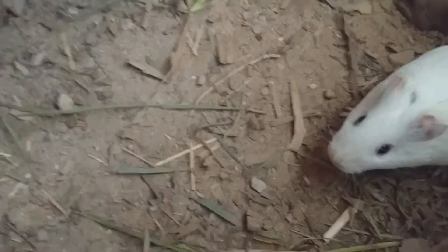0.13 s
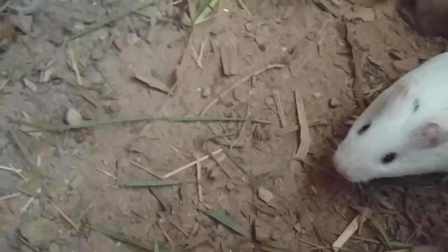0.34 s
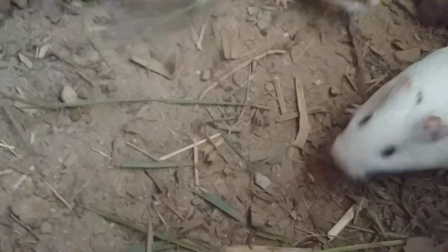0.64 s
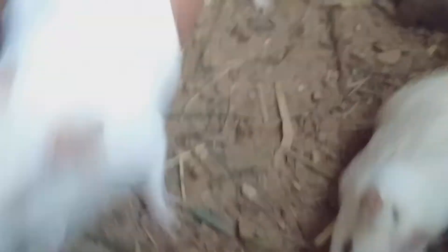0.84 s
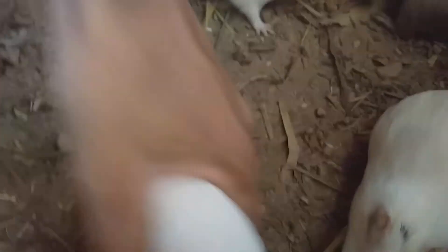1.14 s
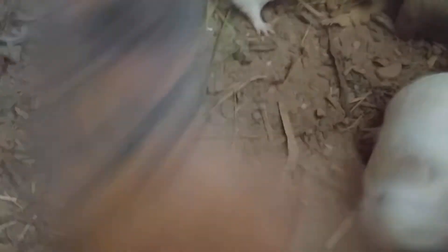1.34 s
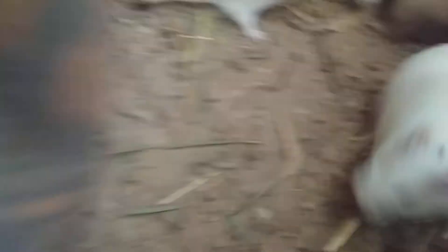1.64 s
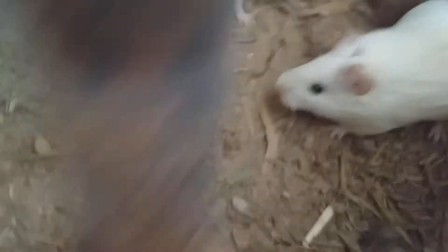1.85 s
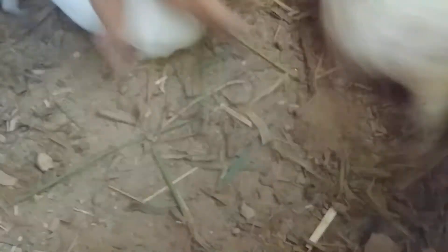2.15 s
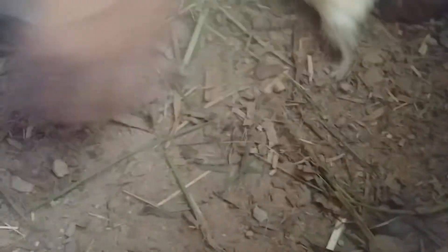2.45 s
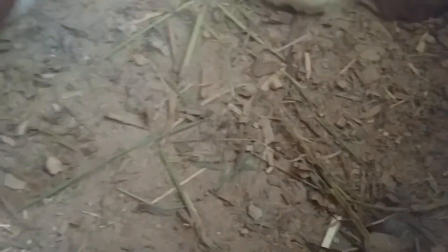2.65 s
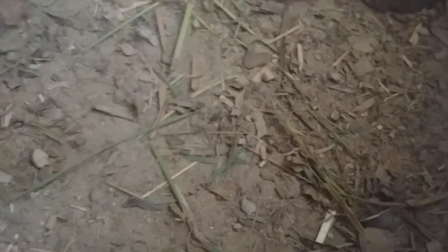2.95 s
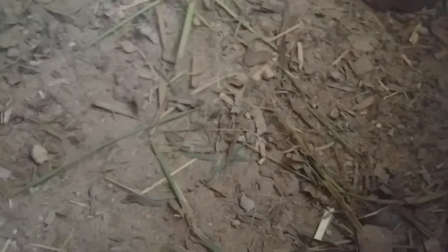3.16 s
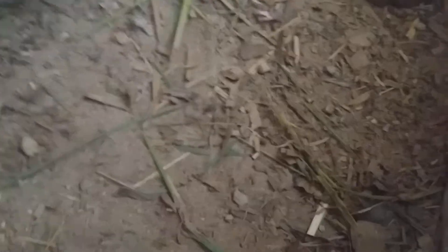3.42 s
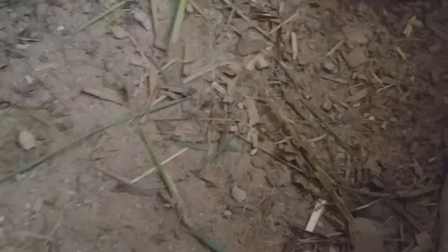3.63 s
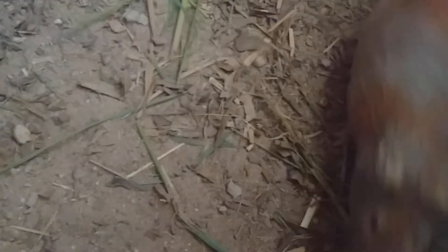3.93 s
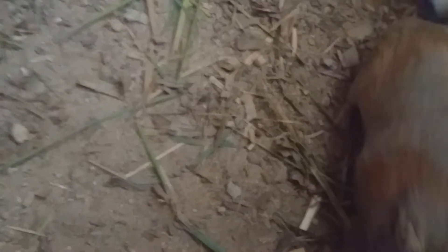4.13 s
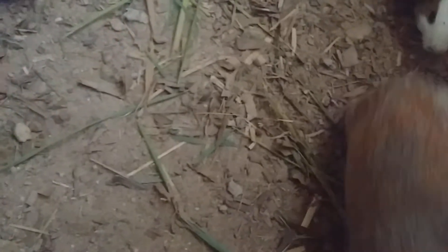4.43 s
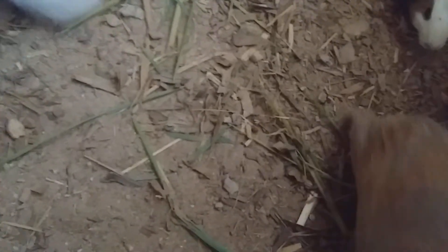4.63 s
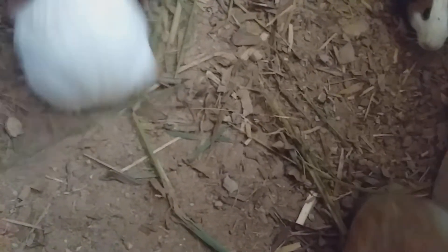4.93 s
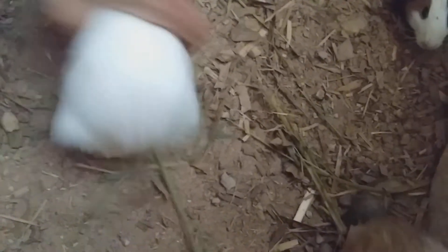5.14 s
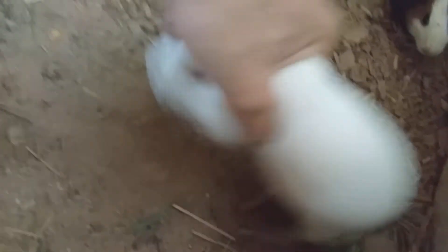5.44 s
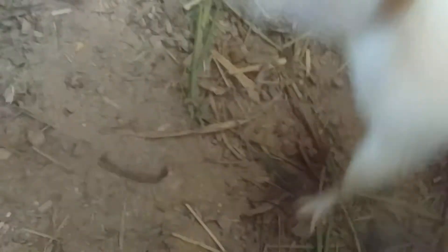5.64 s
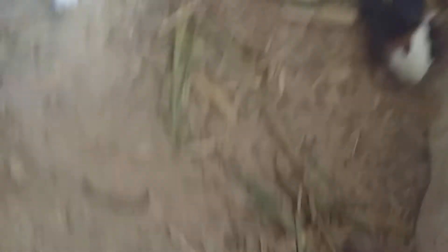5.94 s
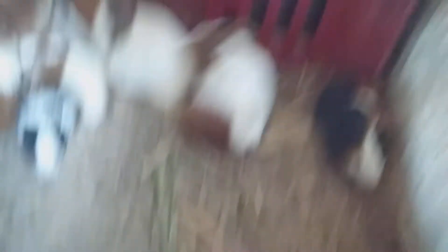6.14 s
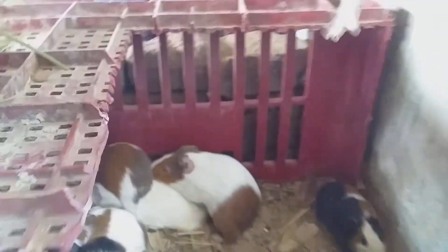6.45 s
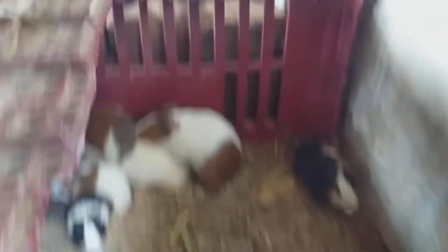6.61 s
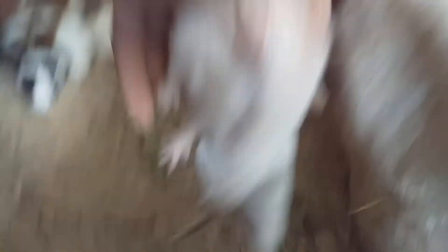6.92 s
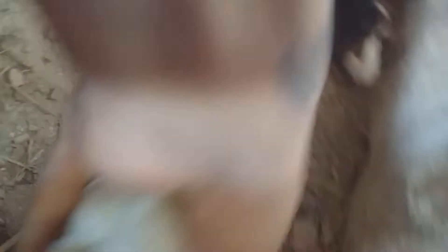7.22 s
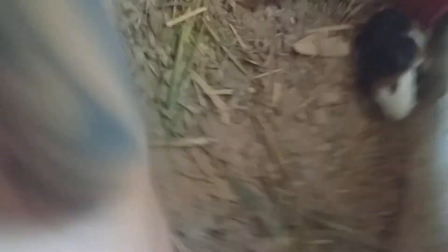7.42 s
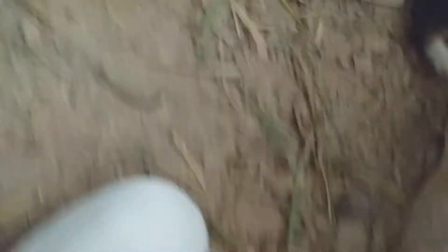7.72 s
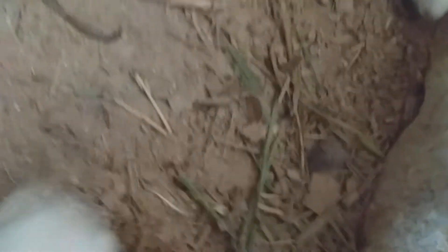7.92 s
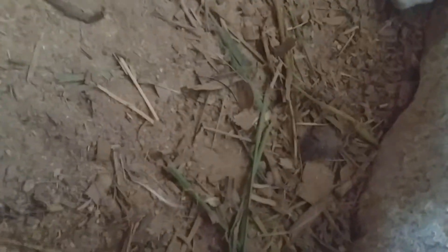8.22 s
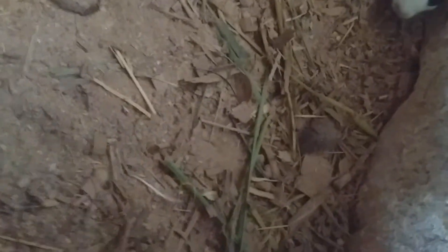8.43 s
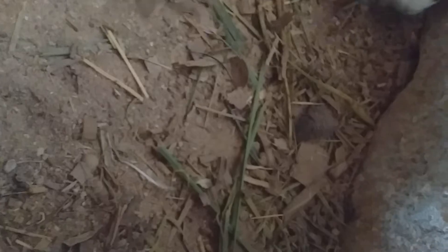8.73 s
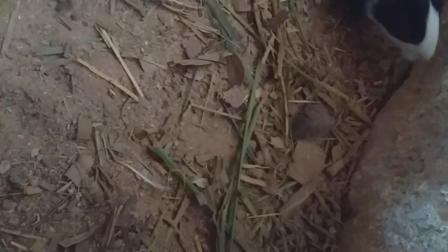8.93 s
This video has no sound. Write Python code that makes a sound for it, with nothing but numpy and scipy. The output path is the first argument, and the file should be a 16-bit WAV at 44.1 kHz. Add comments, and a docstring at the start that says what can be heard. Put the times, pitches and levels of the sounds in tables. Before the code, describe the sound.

A close, small-microphone scene of about nine seconds in an earth-floored pen with short reverberation and a faint low hum. It opens with stirred straw, small stalk snaps, soft low guinea pig clucks, a huddle peeping further off and faint falling bird cheeps. From 0.6 s chased animals whistle in quick rising glides; around 1.6-2 s something drags with a thin, high scrape amid scuffling. Between 2.8 and 5.5 s the whistles crowd together, sweeping from low throaty starts to piercing tops, the strongest near 5.4 s; a dull thump falls at 3.5 s. Around 6 s voices drop away to a husky rustle, then distant cheeps and a diffuse sweep near 7 s. Hard, low thumps cluster at 7.5-7.7 s with sharp snaps. Low chatter resumes, and weaker rising whistles return from 8.5 s over rustling litter to the end.

```python
"""Cavies in an earth-floored pen; stirred litter (noise and grains), chatter (gliding tones) and far cheeps open.
From 0.6 s loud whistles (gliding partials) come from the ones being chased; at 1.6 s something drags (resonant noise).
Most whistles fall between 2.8 and 5.5 s; a husky rustle follows at 6 s, then far cheeps and a diffuse sweep near 7 s.
Low rings thump the ground throughout, hardest at 7.5-7.7 s; stalks snap (short noise bursts); whistles return at 8.5 s.
A small microphone takes it in: near calls with the pen's short reverberation, a low hum (banded noise) behind."""
import sys
import numpy as np
from scipy import signal
from scipy.io import wavfile
from scipy.ndimage import map_coordinates

SR = 44100
rng = np.random.default_rng(int(sys.argv[2]) if len(sys.argv) > 2 else 0)


def persist_wave(psi):
    """Save psi, clipped to +-1, as 16-bit WAV."""
    counts = np.round(np.clip(psi, -1, 1) * 32767).astype(np.int16)
    wavfile.write(sys.argv[1], SR, np.atleast_2d(counts).T)


N = 399987

# near, open-mouthed whistles, one curve per call: [t/s, pitch f/Hz, fundamental level/dB, octave level/dB,
# third partial level/dB]
WHISTLE_CURVES = [
    [(0.6, 1345, -53, -72, -62), (0.618, 1502, -47, -60, -54), (0.646, 1466, -42.5, -52, -53),
     (0.66, 1675, -55, -57, -77), (0.682, 2150, -45, -35.5, -68), (0.7, 2325, -42, -48, -62),
     (0.732, 2530, -46, -40, -74), (0.76, 2820, -45, -50, -41), (0.764, 2690, -25, -33, -30),
     (0.769, 2725, -37, -29, -27.5), (0.782, 2807, -33, -28, -22), (0.802, 2730, -30, -35, -24),
     (0.814, 2910, -29, -66, -68), (0.82, 2840, -25, -70, -60)],
    [(1.983, 1094, -51, -68, -66), (1.989, 1057, -35, -67, -68), (1.999, 988, -40, -56, -66),
     (2.013, 1005, -31, -60, -69), (2.031, 1082, -31.5, -48, -55), (2.057, 1364, -34.5, -55, -66),
     (2.071, 1387, -40, -57, -68), (2.087, 1590, -49, -60, -71), (2.105, 1650, -47, -50, -65),
     (2.125, 1664, -56, -52, -68), (2.155, 1760, -51, -53, -85), (2.173, 1760, -64, -66, -77)],
    [(2.76, 1013, -67, -74, -79), (2.782, 1085, -41.5, -73, -67), (2.806, 1815, -40, -48, -85),
     (2.818, 2050, -66, -48, -69), (2.842, 2313, -34.5, -63, -56), (2.94, 2725, -32.5, -45, -51),
     (2.948, 2880, -21, -48, -41.5), (2.996, 3335, -25, -35.5, -36), (3.058, 3790, -31, -40, -38),
     (3.076, 4010, -29, -29, -38), (3.102, 4270, -40, -28, -26.5), (3.126, 4090, -30, -24, -61)],
    [(3.21, 1102, -65, -73, -73), (3.23, 1013, -39.5, -57, -57.5), (3.25, 945, -44, -66, -60.5),
     (3.294, 1303, -47.5, -52, -51), (3.328, 1946, -39, -50, -66), (3.386, 2330, -37, -48, -51.5),
     (3.486, 2780, -40, -53, -63), (3.522, 3240, -26.5, -28.5, -33.5), (3.552, 3680, -36.5, -28.5, -52),
     (3.566, 3790, -23, -43, -65), (3.588, 3823, -25.5, -36, -65)],
    [(4.015, 2350, -44, -66, -86), (4.06, 2585, -58, -60, -86), (4.12, 2740, -39, -64, -57),
     (4.128, 2784, -35.5, -50, -56), (4.144, 2900, -28.5, -46, -54), (4.168, 2994, -25, -40.5, -70),
     (4.178, 3080, -37, -52, -49), (4.188, 3720, -34, -37, -48), (4.204, 3720, -40, -51, -40),
     (4.222, 3840, -31, -36, -37), (4.234, 3890, -34.5, -27, -37.5), (4.258, 4070, -35, -37.5, -52)],
    [(4.375, 834, -63, -85, -79), (4.385, 933, -50, -59, -87), (4.433, 1065, -44, -54, -58),
     (4.461, 1517, -55, -49, -74), (4.477, 1550, -41, -49, -78), (4.493, 1924, -47.5, -57, -90),
     (4.541, 1800, -48, -49, -80), (4.565, 2080, -47, -80, -77), (4.591, 1835, -46, -49, -82),
     (4.621, 1500, -38.5, -75, -82), (4.669, 1653, -42, -51, -77), (4.69, 1890, -48, -46.5, -82)],
    [(4.7, 2110, -46, -65, -85), (4.724, 2290, -47, -52, -60), (4.762, 2440, -36.5, -46.5, -52.5),
     (4.796, 2580, -38, -62, -48), (4.81, 2700, -47, -54, -51), (4.82, 3076, -21.5, -38.5, -53),
     (4.868, 3430, -32.5, -31, -24.5), (4.906, 3565, -31, -38, -23), (4.914, 3710, -24, -22, -17),
     (4.928, 3836, -24.5, -23, -25), (4.938, 3910, -22.5, -22, -22), (4.948, 3970, -31, -42, -23),
     (4.958, 3874, -29, -27, -27), (4.964, 3680, -21, -29, -30)],
    [(5.09, 1029, -49, -72, -51), (5.108, 960, -37, -82, -47), (5.148, 1254, -38, -55, -47),
     (5.2, 2290, -40.5, -47, -53), (5.238, 2603, -29.5, -52, -45.5), (5.3, 2720, -34.5, -48, -45),
     (5.314, 2725, -39, -39, -39.5), (5.326, 2880, -31.5, -41, -35), (5.344, 3270, -18, -31, -36),
     (5.356, 3395, -18, -28, -32), (5.37, 3441, -17, -36, -31), (5.378, 3640, -29, -28, -21),
     (5.388, 3769, -24.5, -32, -17), (5.414, 3870, -15.5, -33, -22), (5.44, 4020, -24.5, -18.5, -26),
     (5.448, 4010, -21, -22, -25), (5.478, 4180, -29, -26, -19), (5.496, 4003, -15.5, -23, -26),
     (5.503, 4010, -16, -23, -23)],
    [(8.78, 1650, -59, -66, -61), (8.792, 1730, -45, -50, -73), (8.806, 1740, -44, -52, -61),
     (8.828, 2220, -48, -65, -83), (8.844, 2140, -43, -78, -72), (8.856, 2055, -43, -53, -83),
     (8.874, 2440, -45.5, -69, -60), (8.892, 2720, -42, -76, -90), (8.952, 2556, -36.5, -69, -51),
     (8.982, 2600, -32.5, -58, -55), (9.0, 2760, -53, -68, -75)],
    [(0.997, 1638, -40, -44, -78), (1.027, 1920, -35, -46.5, -74), (1.039, 2087, -42.5, -51, -105),
     (1.077, 2283, -34, -44, -31), (1.085, 2240, -35.5, -39, -30.5), (1.115, 2130, -57, -38, -49)],
    [(1.8, 1080, -55, -69, -63), (1.812, 1480, -41.5, -70, -55), (1.84, 2260, -49, -49, -64),
     (1.884, 2250, -55, -62, -71), (1.91, 2350, -45, -50, -63), (1.92, 2420, -75, -64, -71)],
    [(3.612, 1536, -63, -63, -83), (3.638, 2056, -55, -69, -66), (3.654, 1550, -47, -45, -73),
     (3.688, 1260, -53, -76, -59), (3.71, 1130, -39.5, -66, -53), (3.74, 1360, -53, -62, -63)],
    [(3.815, 2250, -53, -74, -80), (3.848, 2420, -42, -44, -55), (3.866, 2830, -38.5, -53, -37.5),
     (3.91, 2795, -28, -50, -35.5), (3.934, 2680, -31.5, -45, -46), (3.962, 2540, -33, -65, -58),
     (4.0, 2160, -49, -58, -52)],
    [(5.67, 756, -58, -75, -81), (5.706, 807, -48, -65, -63), (5.75, 838, -43.5, -51, -60),
     (5.768, 777, -47.5, -58, -65), (5.775, 754.1, -44, -68, -84)],
    [(8.45, 1955, -54, -74, -79), (8.48, 2140, -49.5, -64, -88), (8.514, 2220, -42.5, -56, -76),
     (8.524, 2400, -48, -75, -90), (8.532, 2580, -40, -74, -81), (8.54, 2720, -44, -68, -87)],
    [(8.56, 2880, -53, -75, -89), (8.582, 3010, -54, -71, -67), (8.612, 3040, -51, -63, -62),
     (8.63, 3280, -56, -81, -77)],
]
# slope of each whistle above its third partial, in the same order: [level/dB per partial]
WHISTLE_SLOPES = [-13, 4, -5.5, -4.5, -6, -1, -6, -4.5, -14, -21, -9, -8, -10, -3, -6, -1]
# colour the mouth gives the overtones: [f/Hz, level/dB]
MOUTH_COLOUR = [(1500, 8), (2450, -1), (3300, 14.5), (4000, 13.5), (5500, 7.5), (6800, 6), (8300, 9.5),
                (9800, 20), (11500, 14.5), (13500, 17), (16000, 11)]
# near, soft chatter notes: [start t/s, length t/s, first f/Hz, middle f/Hz, last f/Hz, level midway/dB]
CHATTER_NOTES = [(.045, 0.08, 681, 781, 824, -49.5), (0.11, 0.023, 760, 717, 710, -46.5),
                 (0.169, 0.065, 1060, 1440, 620, -53.5), (0.336, 0.053, 682, 580, 606, -46.5),
                 (.39, 0.022, 497, 470, 474, -32), (0.439, 0.054, 717, 570, 614, -50),
                 (0.683, 0.052, 802, 700, 655, -51), (0.839, 0.062, 599, 650, 555, -56),
                 (0.943, 0.046, 904, 774, 760, -55), (1.26, 0.078, 1130, 1085, 1155, -50.5),
                 (1.312, 0.023, 1140, 1216, 1350, -39), (1.442, 0.079, 898, 817, 925, -47),
                 (1.504, 0.08, 1010, 1108, 1080, -45.5), (1.757, 0.057, 1100, 1112, 1080, -40),
                 (2.191, 0.042, 807, 1000, 1140, -47.5), (2.195, 0.077, 1760, 1760, 1590, -53),
                 (2.304, 0.057, 986, 1024, 1290, -45.5), (2.32, 0.085, 1476, 1570, 1330, -51.5),
                 (2.373, 0.076, 1810, 1655, 1190, -57), (2.455, 0.023, 1100, 1090, 1130, -50),
                 (2.484, 0.046, 743, 832, 877, -44), (2.628, 0.068, 616, 628, 630, -56.5),
                 (2.735, 0.03, 742, 810, 870, -50), (2.94, 0.021, 580, 563, 540, -45),
                 (3.032, 0.039, 604, 610, 645, -53.5), (3.171, 0.055, 450, 474, 440, -50),
                 (3.319, 0.034, 597, 600, 533, -49.5), (3.348, 0.046, 655, 720, 830, -53),
                 (3.406, 0.1, 785, 1000, 1070, -54.5), (3.664, 0.033, 844, 863, 950, -48),
                 (3.759, 0.033, 710, 730, 820, -50), (3.745, 0.072, 1510, 1800, 1880, -50.5),
                 (4.158, 0.06, 2650, 3000, 3230, -46), (4.265, 0.067, 1830, 1850, 1880, -62),
                 (4.26, 0.03, 1010, 1120, 1220, -48.5), (4.407, 0.033, 2800, 3050, 3370, -56),
                 (4.688, .04, 2890, 3300, 3300, -53), (4.987, 0.051, 640, 830, 620, -56),
                 (4.598, .06, 1154, 903, 720, -59), (4.56, 0.051, 684, 960, 1280, -62),
                 (3.755, 0.046, 996, 950, 1070, -53), (3.922, 0.073, 1068, 1057, 1150, -52),
                 (3.978, 0.13, 973, 1087, 997, -54.5), (3.928, 0.013, 395, 394, 330, -39),
                 (4.072, 0.04, 1136, 1186, 1090, -47), (4.176, 0.097, 722, 1162, 1940, -49.5),
                 (4.23, 0.04, 673, 726, 850, -51), (4.445, 0.045, 600, 697, 630, -48.5),
                 (4.485, 0.036, 900, 1040, 1250, -47), (4.52, 0.07, 1480, 1530, 1570, -59),
                 (4.568, 0.057, 1000, 1240, 1010, -50), (4.664, 0.069, 980, 1110, 1126, -50),
                 (4.677, 0.032, 782, 1025, 905, -46.5), (4.69, 0.11, 1750, 1810, 1480, -58),
                 (4.901, 0.047, 1107, 1180, 1190, -48.5), (4.933, 0.038, 1200, 1335, 1610, -56),
                 (4.965, 0.13, 1580, 1460, 1290, -56), (5.307, 0.051, 1150, 928, 845, -49.5),
                 (5.514, 0.12, 842, 874, 860, -52), (5.53, 0.027, 707, 674, 636, -49.5),
                 (5.532, 0.072, 1225, 1550, 1310, -57.5), (5.576, 0.074, 626, 657, 640, -49.5),
                 (5.814, 0.092, 546, 756, 707, -52.5), (5.891, 0.13, 1047, 1600, 1020, -66),
                 (6.06, 0.016, 513, 473, 467, -41), (6.219, 0.049, 1700, 1030, 860, -58.5),
                 (6.617, 0.058, 465, 525, 602, -57.5), (7.661, 0.038, 460, 562, 625, -50.5),
                 (7.81, 0.066, 852, 786, 870, -61), (7.851, 0.032, 362, 347, 385, -43.5),
                 (7.925, 0.084, 392, 473, 514, -44), (7.989, 0.04, 335, 332, 350, -42),
                 (8.089, 0.022, 565, 550, 577, -46), (8.112, 0.029, 815, 863, 740, -49),
                 (8.142, 0.013, 340, 325, 320, -42.5), (8.165, 0.12, 1088, 1013, 795, -59.5),
                 (8.3, 0.017, 502, 530, 640, -46), (8.283, 0.1, 960, 987, 990, -59),
                 (8.319, 0.043, 770, 793, 885, -51.5), (8.754, 0.075, 2720, 2620, 2630, -53),
                 (8.837, 0.041, 691, 640, 666, -46), (8.868, 0.038, 700, 982, 1300, -51.5),
                 (8.65, 0.053, 1945, 1960, 1670, -57.5), (8.364, 0.028, 1084, 1310, 1240, -56),
                 (8.816, 0.065, 2900, 3150, 3220, -56)]
# thumps on the ground: [t/s, level/dB before the ring's gain, ring f/Hz, 60 dB decay t/s]
THUMP_HITS = [(0.379, -42, 180, 0.11), (1.206, -49, 220, 0.25), (1.419, -44, 140, 0.069),
              (1.578, -40.5, 197, 0.07), (1.797, -41, 156, 0.14), (2.289, -42, 91.5, 0.072),
              (3.246, -43, 152, 0.11), (3.535, -28, 125, 0.1), (5.283, -42, 102, 0.087),
              (5.501, -46.5, 90, 0.11), (6.062, -46, 94.5, 0.17), (6.318, -42.5, 116, 0.11),
              (7.145, -40.5, 186, 0.036), (7.276, -35, 145, 0.061), (7.465, -18, 135.4, 0.11),
              (7.523, -19.5, 129, 0.082), (7.599, -41, 173, 0.048), (7.645, -11.5, 123, 0.028),
              (7.695, -30, 160, 0.04), (7.715, -9, 298, 0.017), (8.428, -31.5, 97, 0.05)]
# stalks snapping: [t/s, level/dB before the common gain, low part level/dB, high part level/dB],
# parts relative to the middle
STALK_SNAPS = [(0.042, -45.5, 2, 15), (0.279, -37, -14, 16.5), (0.388, -33, 6, 6), (0.403, -37, -8, 21),
               (0.4098, -32, -1, -25), (0.422, -28.5, -11, 17.5), (0.699, -32.5, -17, 7),
               (0.8444, -31, -13, 8), (1.2191, -38, 8.5, -2), (1.353, -32, -9, 8.5),
               (2.058, -35, -23.5, 10), (2.154, -40, -20, 2), (2.271, -31.5, -4.5, -15),
               (2.36, -34.5, -9, 13), (2.697, -43.5, 1, 11), (2.783, -49, 3, 0), (3.1313, -44.5, 1, 22),
               (3.157, -39, -4, 12), (3.241, -35.5, -2.5, 10.5), (3.852, -26, -14.5, 6),
               (4.028, -36.5, -4, 4), (5.104, -42, 3.5, -5), (5.732, -44, -20, -21), (5.7466, -41, -16, 5),
               (6.537, -36.5, -24, -3), (6.952, -71, -5, -13), (6.998, -64, -8, 37), (7.014, -46, -20, 17),
               (7.085, -68, 0, 34), (7.2534, -23, -15.5, -18), (7.291, -32.5, -13, -18),
               (7.4594, -21, -45, -4), (7.603, -40, -3, -9), (7.646, -31, 2, 0), (7.653, -25.5, -28, -4),
               (7.678, -52, -15, 18), (7.704, -46.5, 5, 19), (7.7145, -33.5, 9, -1), (7.797, -24, -28, -1),
               (7.894, -42.5, 0, 17), (8.08, -51.5, -14, 26), (8.144, -35, -9, 8), (8.374, -42.5, -7, 22),
               (8.413, -52, 8.5, -10), (8.507, -38, 1, -10), (8.526, -58, 7, -10), (8.55, -27, -7.5, -3),
               (8.629, -32, -11.5, -3), (8.72, -44, -19, 17)]
# time a snap takes to fall 20 dB in its low, middle and high part: [t/s]
SNAP_FALLS = [0.017, 0.009, 0.009]
# scuffles of feet and hand: [loudest t/s, length t/s, earth level/dB, straw level/dB, dry chaff level/dB]
SCUFFLE_HITS = [(0.136, 1, -64, -55.5, -81), (0.423, 0.077, -49.5, -38.5, -41.5),
                (0.72, 0.14, -77, -54, -39.5), (0.93, 0.073, -59, -68, -59), (1.22, 0.062, -42, -41.5, -70),
                (1.306, 0.98, -64, -101, -53), (1.665, 0.26, -47.5, -71, -49),
                (1.8, 0.28, -42.5, -41.5, -35), (2.27, 0.34, -63, -55, -40), (2.945, 0.17, -53.5, -56, -47),
                (3.263, 0.07, -57, -47.5, -68), (3.537, 0.065, -54, -48, -53), (3.97, 0.15, -52, -48, -51),
                (4.233, 1, -59, -54.5, -56.5), (4.79, 0.28, -63, -49.5, -47),
                (4.973, 0.091, -58, -48.5, -63), (5.14, 0.082, -56.5, -44, -66),
                (5.286, 0.35, -64, -50, -40.5), (6.063, 0.27, -57, -55.5, -50.5),
                (6.66, 0.56, -63.5, -61, -55), (6.959, 0.015, -45.5, -73, -68),
                (7.29, 0.043, -43, -46, -62), (7.464, 0.045, -44.5, -43, -64),
                (7.694, 0.09, -58, -48.5, -58), (7.998, 1, -57.5, -56, -52.5),
                (8.515, 0.35, -51.5, -60, -72), (8.758, 0.42, -86, -77, -48.5),
                (9.06, 0.32, -54.5, -67, -49)]
# general bustle in the bedding, before the offset of each grain size: [t/s, level/dB]
BUSTLE_LEVEL = [(0, -56.5), (.6, -49.5), (1.1, -51), (1.47, -57), (2.0, -49), (2.45, -50), (2.59, -61),
                (2.8, -47.5), (3.19, -51.5), (3.9, -48.5), (4.6, -56.5), (5.2, -52.5), (5.74, -50.5),
                (5.81, -61), (5.93, -60.5), (6.1, -52), (6.5, -53.5), (6.7, -80), (6.92, -79), (6.98, -69),
                (7.07, -53.5), (7.57, -54.5), (8.0, -58.5), (9.07, -48.5)]
# spectral density of scuffed earth: [f/Hz, relative level/dB per Hz]
EARTH_SPECTRUM = [(80, -6), (150, 7.5), (300, 1.5), (500, 12.5), (800, -33), (1300, -35), (2500, -41)]
# spectral density of straw: [f/Hz, relative level/dB per Hz]
STRAW_SPECTRUM = [(500, 3), (1000, 9), (1600, 1), (2400, 5.5), (3500, 8.5), (5000, -9), (8000, -51)]
# spectral density of fine chaff: [f/Hz, relative level/dB per Hz]
CHAFF_SPECTRUM = [(2500, -41), (4500, -1.5), (6500, -1.5), (8000, -5.5), (11000, -3), (14000, 0),
                  (16500, -8)]
# resonances of a long scrape: [f/Hz, width f/Hz before widening, relative level/dB]
SCRAPE_RESONANCES = [(4220, 200, 6), (5970, 170, 5.5), (7440, 86, 5), (9370, 360, 5), (10400, 91, 2),
                     (11350, 570, 6)]
# course of the scrape: [t/s, level/dB]
SCRAPE_LEVEL = [(1.579, -54.5), (1.66, -37.5), (1.8, -35.5), (1.92, -41.5), (1.99, -48)]
# resonances of a soft husky rustle: [f/Hz, width f/Hz before widening, relative level/dB]
RUSTLE_RESONANCES = [(2065, 30, 3.5), (2270, 83, 4.5), (2630, 110, 2), (3400, 86, -2), (4830, 200, -1),
                     (5500, 110, -1)]
# course of the rustle: [t/s, level/dB]
RUSTLE_LEVEL = [(5.97, -77), (6.08, -53.5), (6.3, -55.5), (6.52, -54.5), (6.56, -62), (6.68, -59),
                (6.78, -71.5)]
# the group further off, middle of the spread of its calls: [t/s, level/dB]
HUDDLE_LEVEL = [(0, -56), (2.5, -56), (2.62, -68), (3.0, -54), (5.0, -54), (5.8, -61), (6.0, -85),
                (7.7, -80), (8.0, -60), (9.07, -60)]
# far bird's gliding cheeps, and one diffuse rustling sweep at 7.05 s (1400 to 2140 Hz):
# [start t/s, length t/s, first f/Hz, last f/Hz, level/dB, pitch spread as a share]
FAR_SWEEPS = [(0.047, 0.17, 3630, 2246, -56, 0.044), (0.499, 0.11, 2740, 2050, -55, .03),
              (0.881, 0.14, 3200, 2374, -52.5, 0.032), (1.065, 0.14, 4470, 3310, -45, 0.033),
              (1.592, 0.16, 3810, 2280, -52.5, 0.024), (2.004, 0.16, 3750, 2426, -53.5, 0.015),
              (4.328, 0.17, 5140, 4700, -63, 0.015), (6.819, 0.22, 4540, 4010, -61, 0.025),
              (6.829, 0.11, 5020, 4680, -64, 0.011), (6.867, 0.11, 2715, 1970, -56.5, 0.052),
              (7.05, 0.18, 1400, 2140, -61.5, .09), (7.053, 0.19, 4730, 4940, -54.5, 0.033),
              (7.11, 0.2, 6900, 7500, -60.5, 0.036), (7.264, 0.18, 4920, 5000, -62, 0.025),
              (7.313, .1, 2650, 2240, -57, 0.043), (7.458, 0.14, 4950, 4650, -64, 0.022),
              (7.467, 0.19, 4400, 3990, -58.5, 0.026), (7.574, 0.15, 2865, 2010, -57, 0.033),
              (8.33, 0.15, 3420, 2154, -55.5, 0.028), (8.733, 0.062, 3270, 2420, -54, 0.039)]
# spectral density of the low hum: [f/Hz, relative level/dB per Hz]
HUM_SPECTRUM = [(18, -47), (30, -51), (60, 5), (102, 4), (134, 4), (220, -10), (400, -3), (520, -35.5),
                (880, -120)]
# course of the hum: [t/s, level/dB]
HUM_LEVEL = [(0.0, -64), (0.81, -63), (1.51, -58.5), (1.77, -56), (2.58, -63), (3.31, -58), (4.95, -63),
             (5.33, -56), (5.68, -67), (6.77, -66), (7.15, -63), (7.6, -48), (7.73, -51), (7.8, -63.5),
             (8.87, -60), (9.07, -66)]

CUTOFF_HZ = 16000   # top of the recorded band
PEN_T60_S, PEN_DB, FAR_T60_S = 0.23, -20, 0.46
EARTH_DB, STRAW_DB, CHAFF_DB = -15, -4, -2.5   # each grain size against the bustle
SCUFFLE_RISE, SCUFFLE_EDGE_DB = 0.45, -11.5   # share of the length spent swelling; level at both ends
# whistles that end high snap down in pitch as they stop: time taken, pitch ratio, level steps
FLICK_ABOVE_HZ, FLICK_S, FLICK_RATIO, FLICK_DB, FLICK_OVER_DB = 3400, 0.0036, 0.8, -1, -48


def amp(db):
    """Amplitude of a level in dB."""
    return np.exp(np.asarray(db) * np.log(10) / 20)


def rms_one(x):
    """The signal scaled to an rms of 1."""
    return x / np.sqrt(np.mean(x ** 2) + 1e-20)


def drift(rate_hz):
    """Slow chance: noise at every eighth sample through a double one-pole low-pass, spread 1."""
    r = np.exp(-16 * np.pi * rate_hz / SR)
    noise = rng.standard_normal(N // 8 + 1002)
    slow = signal.lfilter([1], [1, -2 * r, r * r], noise)[1000:]   # drop the filter's start
    return np.interp(np.arange(N) / 8, np.arange(len(slow)), rms_one(slow))


def band(x, low_hz, high_hz):
    """The part of a signal between two frequencies."""
    return signal.sosfilt(signal.butter(2, [low_hz, high_hz], "band", fs=SR, output="sos"), x)


def coloured(source, spectrum, patchy_db):
    """About half-octave bands of two source rows in turn, each with its level and own flicker; rms 1."""
    hz, db = np.transpose(spectrum)
    edges = np.geomspace(hz[0], hz[-1], int(2 * np.log2(hz[-1] / hz[0])) + 2)
    out = 0
    for k, (low, high) in enumerate(zip(edges, edges[1:])):
        level_db = np.interp(np.log(low * high) / 2, np.log(hz), db)
        out = out + amp(level_db + patchy_db * drift(9.3)) * band(source[k % 2], low, high)
    return rms_one(out)


def crackle(per_s, spread_db, hiss):
    """Two rows of random grains of uneven size over smooth noise; the grains come in clumps."""
    sizes = amp(spread_db * np.minimum(rng.exponential(1, (2, N)), 5))
    signs = rng.choice([-1, 1], (2, N))
    born = rng.random((2, N)) < per_s * amp(6 * drift(20)) / SR
    return rms_one(sizes * signs * born) + hiss * rng.standard_normal((2, N))


def note(rows, wobble, fade_s):
    """Sample span, phase, pitch, level columns and fade of one voiced note whose pitch trembles."""
    s, hz, *levels = np.transpose(rows)
    at = np.arange(max(int((s[0] - fade_s) * SR), 0), min(int((s[-1] + fade_s) * SR), N))
    t = at / SR
    pitch_hz = np.interp(t, s, hz)
    phase = 2 * np.pi * np.cumsum(pitch_hz * (1 + wobble[at])) / SR
    to_edge_s = np.minimum(t - s[0], s[-1] - t)
    fade = np.clip(to_edge_s / (2 * fade_s) + .5, 0, 1) ** 2
    return at, phase, pitch_hz, [np.interp(t, s, column) for column in levels], fade


def echoes(x, t60):
    """Dense reflections dying away after a short gap; unit energy."""
    t = np.arange(int(.6 * SR)) / SR
    tail = rng.standard_normal(len(t)) * amp(-60 * t / t60) * (t > .004)
    return signal.fftconvolve(x, tail / np.sqrt(np.sum(tail ** 2)))[:N]


def whistles(tremble=0.0089, flutter_db=2.5, uneven=0.36, muffle_db=-20, breath_db=-28, hiss_db=-34, hoarse_db=8):
    """Fluttering partials on one trembling pitch; past the third they follow a slope and the mouth's colour."""
    out, wobble, air = np.zeros(N), tremble * drift(51.5), drift(170)
    flutter = [flutter_db * 1.59 * np.tanh(drift(62) / 1.33) for _ in range(4)]   # tanh bounds the swings
    hiss = band(rng.standard_normal(N), 3000, 15000)
    mouth_hz, mouth_db = np.transpose(MOUTH_COLOUR)
    for rows, slope_db in zip(WHISTLE_CURVES, WHISTLE_SLOPES):
        rows = list(rows)
        s, end_hz, first_db, octave_db, over_db = rows[-1]
        if end_hz > FLICK_ABOVE_HZ:
            rows.append((s + FLICK_S, end_hz * FLICK_RATIO, first_db + FLICK_DB,
                         octave_db + FLICK_OVER_DB, over_db + FLICK_OVER_DB))
        at, phase, hz, (first_db, octave_db, over_db), fade = note(rows, wobble, fade_s=.0045)
        # air rushing past the teeth
        out[at] += amp(np.maximum(first_db, over_db) + hiss_db) * fade * hiss[at]
        # low in the glide the lips are still narrow and muffle the top
        narrow = np.clip((2150 - hz) / 350, 0, 1)
        # turbulent air shakes each partial, most in low notes
        breath = amp(breath_db + hoarse_db * np.clip((1500 - hz) / 500, 0, 1))
        for k in range(1, min(9, int(CUTOFF_HZ / hz.min()) + 1)):
            if k < 3:
                level_db = [first_db, octave_db][k - 1]
            else:
                colour_db = np.interp(k * hz, mouth_hz, mouth_db) - np.interp(3 * hz, mouth_hz, mouth_db)
                level_db = over_db + slope_db * (k - 3) + colour_db
            level_db = level_db + muffle_db * np.clip((k * hz - 4600) / 800, 0, 1) * narrow
            level_db = level_db + (1 + uneven * (k - 0.5)) * flutter[k % 4][at]
            rough = 1 + breath * k * air[at]
            partial = np.sin(k * phase) * (k * hz < .45 * SR)
            out[at] += np.sqrt(2) * amp(level_db) * fade * rough * partial
    return out


def chatter(tremble=.016, flutter_db=3.5, over_db=-8, tilt_db=-12.0, ends_db=1.0):
    """Short, soft notes, almost sines arcing through three pitches, with overtones that change note to note."""
    out, wobble = np.zeros(N), tremble * (drift(70.5) + drift(26.6))
    flutter = flutter_db * drift(120.0)
    chances_db = rng.normal(0, 3, (len(CHATTER_NOTES), 4))
    for (s, length, first, middle, last, db), chance_db in zip(CHATTER_NOTES, chances_db):
        rows = [(s, first, db + ends_db), (s + length / 2, middle, db), (s + length, last, db + ends_db)]
        at, phase, hz, (level_db,), fade = note(rows, wobble, fade_s=0.0079)
        # the lowest grunts are hummed, steady and nearly pure
        open_mouth = np.clip((hz - 400) / 300, .1, 1)
        overtones = 0
        for k in range(2, 6):
            mouth_db = np.interp(k * hz, *np.transpose(MOUTH_COLOUR))
            overtone_db = over_db + tilt_db * (k - 1) + chance_db[k - 2] + mouth_db
            overtones = overtones + amp(overtone_db) * np.sin(k * phase)
        voice = np.sin(phase) + open_mouth * overtones
        out[at] += np.sqrt(2) * amp(level_db + open_mouth * flutter[at]) * fade * voice
    return out


def thumps(rise_cycles=0.44, sag=0.068, slap=0.49, knock=0.24, knock_hz=750, knock_s=0.0024):
    """A soft body lands: a low ring that swells within a cycle and sags in pitch as it dies."""
    out, t = np.zeros(N), np.arange(12000) / SR
    for s, db, hz, t60 in THUMP_HITS:
        phase = 2 * np.pi * np.cumsum(hz * (1 - sag * (1 - np.exp(-t / 0.04)))) / SR
        swell = 1 - np.exp(-(t * hz / rise_cycles) ** 2)
        # a higher mode, gone after a cycle or two
        higher_mode = slap * np.exp(-t * hz) * np.sin(2.28 * phase)
        ring = amp(db + 3.0 - 60 * t / max(t60, .02)) * swell * (np.sin(phase) + higher_mode)
        # the first touch, harder on stiffer ground
        touch = knock * (hz / 270) ** 2 * np.exp(-t / knock_s) * np.sin(2 * np.pi * knock_hz * t)
        at = round(s * SR)
        out[at:at + len(t)] += ring + amp(db) * touch
    return out


def snaps(gain_db=-8, crack=0.82, crack_s=0.00039):
    """Each stalk's snap is a burst of noise dying fast, weighted low, middle and high."""
    parts, t = np.zeros((3, N)), np.arange(3000) / SR
    decay = amp(-20 * t / np.array(SNAP_FALLS)[:, None])
    decay = decay * (1 + crack * np.exp(-t / crack_s))   # sharpest at the break
    noises = rng.standard_normal((len(STALK_SNAPS), len(t)))
    for (s, db, low_db, high_db), noise in zip(STALK_SNAPS, noises):
        at = round(s * SR)
        weights_db = np.array([[low_db], [0], [high_db]])
        parts[:, at:at + len(t)] += amp(db + gain_db + weights_db) * decay * noise
    out = np.zeros(N)
    bands = [(8.1, 305, 1230), (2.56, 1380, 5070), (0.64, 2900, 19000)]   # gain, f/Hz from and to
    for part, (gain, low_hz, high_hz) in zip(parts, bands):
        out += gain * band(band(part, low_hz, high_hz), low_hz, high_hz)   # twice for steeper edges
    return out


def litter():
    """Three grain sizes of stirred bedding, dull scuffs to fine chaff: a general bustle and single scuffles."""
    t = np.arange(N) / SR
    bustle_db = np.interp(t, *np.transpose(BUSTLE_LEVEL))
    power = amp(bustle_db + np.array([[EARTH_DB], [STRAW_DB], [CHAFF_DB]])) ** 2
    for s, length, *levels_db in SCUFFLE_HITS:
        near = slice(max(int((s - 2 * length) * SR), 0), int((s + 2 * length) * SR))
        before, after = (s - t[near]) / SCUFFLE_RISE, (t[near] - s) / (1 - SCUFFLE_RISE)
        away = np.maximum(before, after) / length   # 0 at the loudest moment, 1 at either end
        power[:, near] += np.outer(amp(levels_db), amp(SCUFFLE_EDGE_DB * away)) ** 2
    earth_gain, straw_gain, chaff_gain = np.sqrt(power)
    shared = amp(2.0 * drift(30))   # straw and chaff flicker together
    earth = coloured(crackle(600, spread_db=3.5, hiss=1.5), EARTH_SPECTRUM, patchy_db=1.8)
    straw = coloured(crackle(1500, spread_db=-1.0, hiss=2.2), STRAW_SPECTRUM, patchy_db=1.8)
    chaff = coloured(crackle(5700, spread_db=3.5, hiss=0.73), CHAFF_SPECTRUM, patchy_db=1.8)
    return earth_gain * earth + shared * (straw_gain * straw + chaff_gain * chaff)


def scrape(resonances, level, widen, sag, patchy_db):
    """Something dragged along: friction noise in a few uneven resonances that sink as it slows."""
    s, level_db = np.transpose(level)
    out, at = np.zeros(N), np.arange(int(s[0] * SR), int(s[-1] * SR))
    noise, step = rng.standard_normal(2 * len(at)), np.arange(2 * len(at))
    rung = 0
    for hz, width, db in resonances:
        half_hz = widen * width / 2
        rung = rung + amp(db + patchy_db * drift(6.0)[step]) * band(noise, hz - half_hz, hz + half_hz)
    # reading the noise ever more slowly lowers its resonances
    read = np.cumsum(np.linspace(1 + sag / 2, 1 - sag / 2, len(at)))
    friction = rms_one(map_coordinates(rung, [read], order=3))
    out[at] = amp(np.interp(at / SR, s, level_db)) * friction
    return out


def huddle(count=230, low_hz=450, high_hz=1900, glide=0.244, spread_db=7.5, second_db=-6):
    """The rest of the group, further off: many brief gliding peeps and clucks at random moments."""
    out, wobble = np.zeros(N), 0.03 * (drift(87) + drift(25))
    for when, pitch, length, bend, loud in rng.random((count, 5)):
        s, hz = when * N / SR, low_hz * (high_hz / low_hz) ** pitch
        level_db = np.interp(s, *np.transpose(HUDDLE_LEVEL)) + spread_db * (2 * loud - 1)
        span_s = 0.0184 + 0.0435 * length ** 2
        end_hz = hz * (1 + glide * (3 * bend - 1))   # more calls rise than fall
        rows = [(s, hz, level_db), (s + span_s, end_hz, level_db)]
        at, phase, hz, (db,), fade = note(rows, wobble, fade_s=0.00513)
        overtones = amp(second_db) * (np.sin(2 * phase) + .5 * np.sin(3 * phase))
        out[at] += amp(db) * fade * (np.sin(phase) + overtones)
    return out


def far_sweeps(echo_db=-5):
    """A far bird's gliding cheeps, thin or husky, and one diffuse rustling sweep, smeared by the yard's echoes."""
    out, wobble, flutter = np.zeros(N), drift(220), 2.5 * drift(45)
    bend = [(0, 0.024), (.25, 0.15), (.75, 0.92), (1, 0.92)]   # the glide starts and ends gently
    for s, length, first, last, level_db, husk in FAR_SWEEPS:
        rows = [(s + a * length, first + b * (last - first), level_db) for a, b in bend]
        at, phase, hz, (db,), fade = note(rows, husk * wobble, fade_s=0.0092)
        out[at] += np.sqrt(2) * amp(db + flutter[at]) * fade * np.sin(phase)
    return out + amp(echo_db) * echoes(out, FAR_T60_S)


def hum():
    """Low background: noise in coloured bands that flicker slightly, following a level curve."""
    level_db = np.interp(np.arange(N) / SR, *np.transpose(HUM_LEVEL))
    return amp(level_db) * coloured(rng.standard_normal((2, N)), HUM_SPECTRUM, patchy_db=1.0)


def scene():
    """All sources in one channel; voices and snaps carry the pen's short reverberation."""
    in_pen = whistles() + chatter() + huddle() + snaps()
    in_pen = in_pen + amp(PEN_DB) * echoes(in_pen, PEN_T60_S)
    dragging = scrape(SCRAPE_RESONANCES, SCRAPE_LEVEL, widen=3.5, sag=0.0097, patchy_db=3.5)
    rustle = scrape(RUSTLE_RESONANCES, RUSTLE_LEVEL, widen=2.9, sag=0.091, patchy_db=2.5)
    return (in_pen + thumps() + litter() + dragging + rustle + far_sweeps() + hum())[None]


def record(dry):
    """The small microphone drops the deep bass; the top of the band is cut steeply."""
    thin = signal.sosfilt(signal.butter(4, 65, "high", fs=SR, output="sos"), dry)
    return signal.sosfilt(signal.cheby2(16, 70, CUTOFF_HZ * 1.02, fs=SR, output="sos"), thin)


dry = scene()
out = record(dry)
persist_wave(out)
```